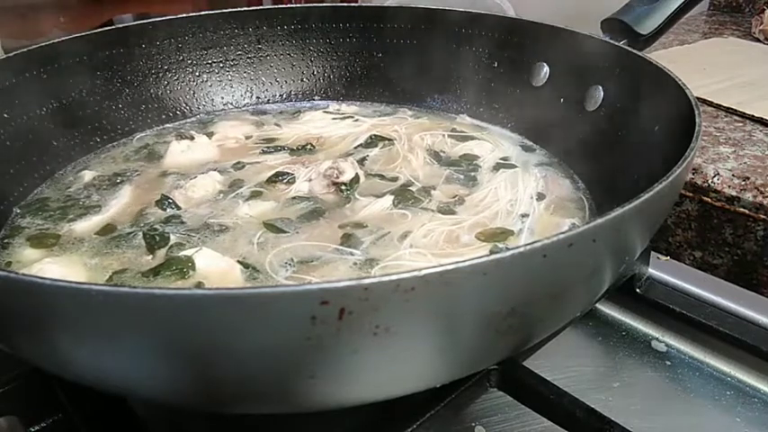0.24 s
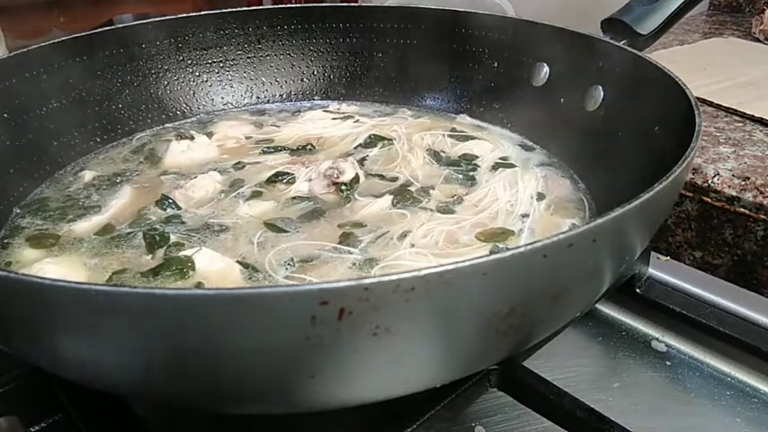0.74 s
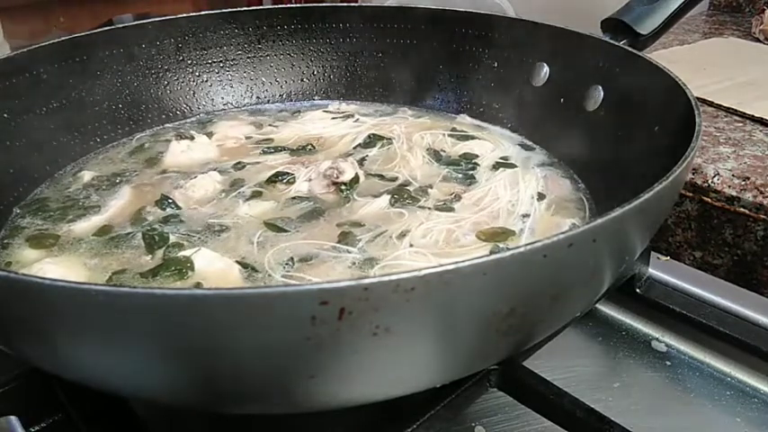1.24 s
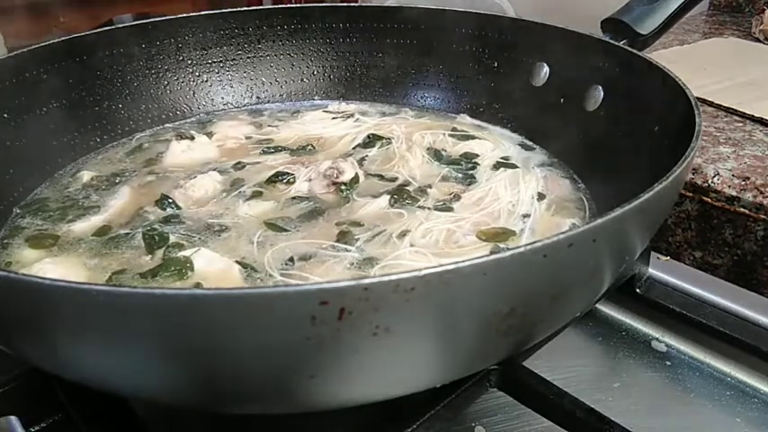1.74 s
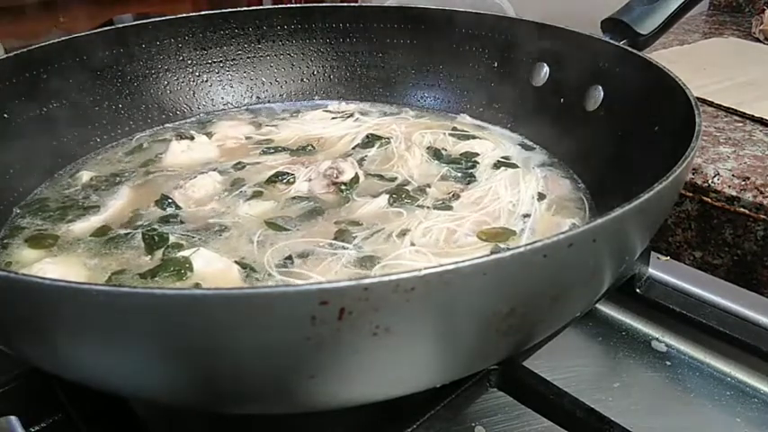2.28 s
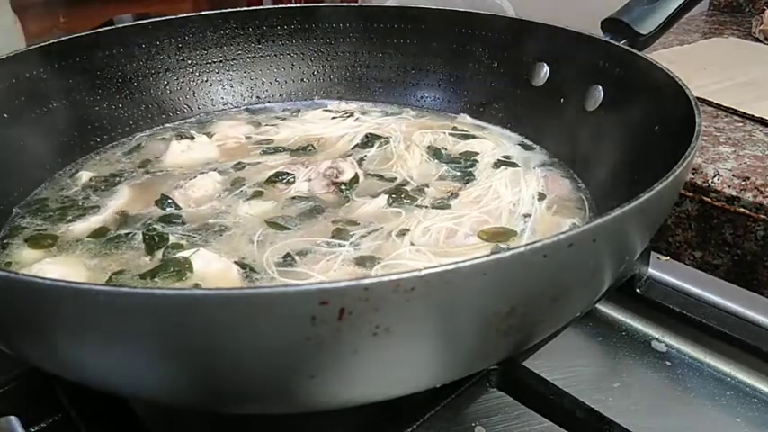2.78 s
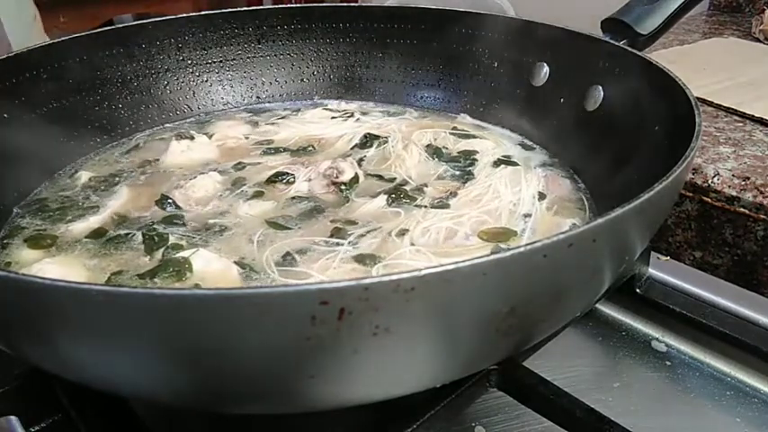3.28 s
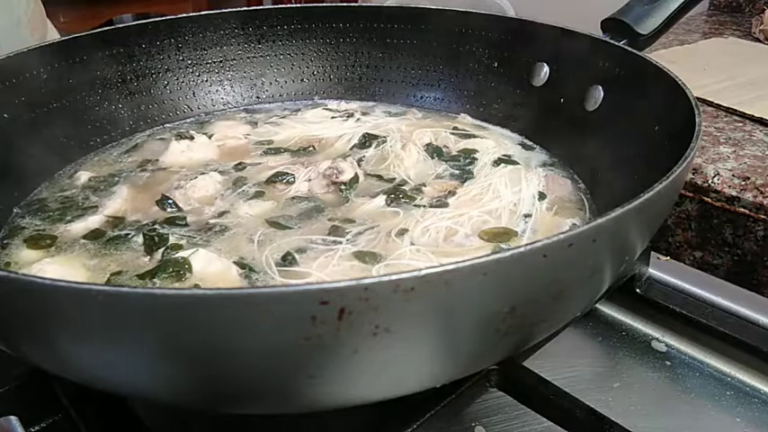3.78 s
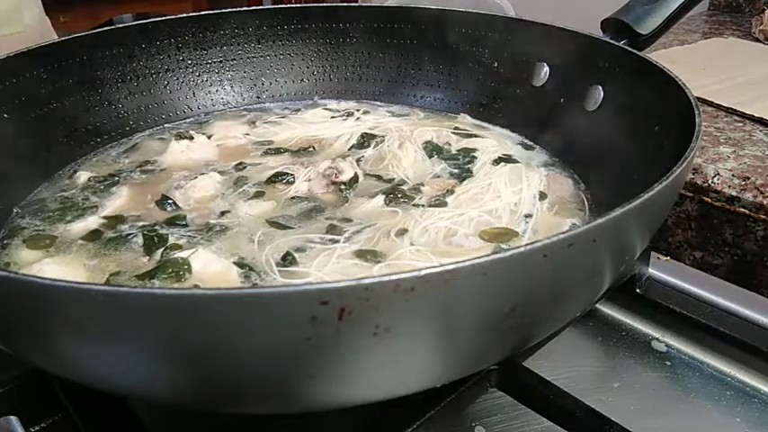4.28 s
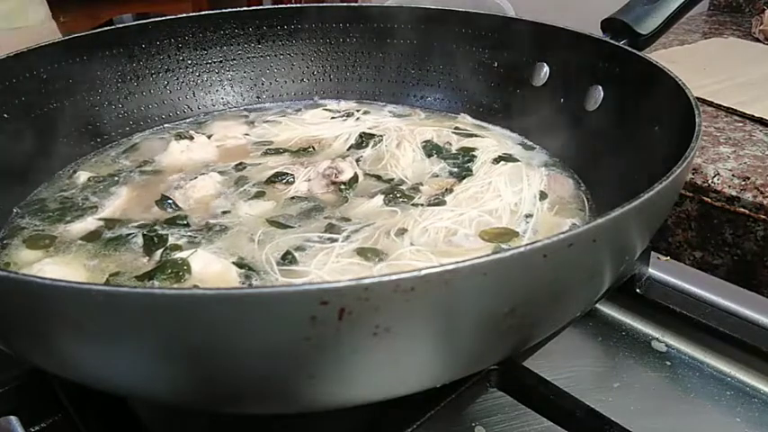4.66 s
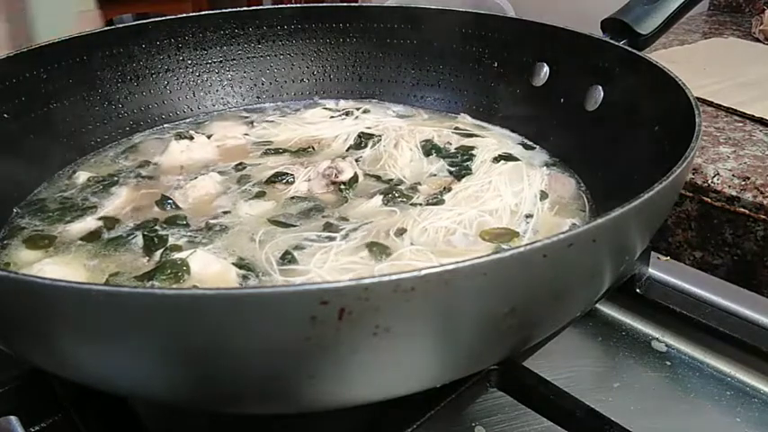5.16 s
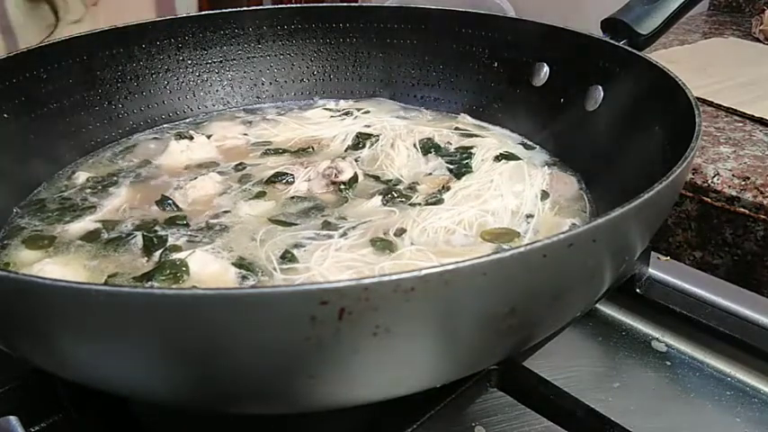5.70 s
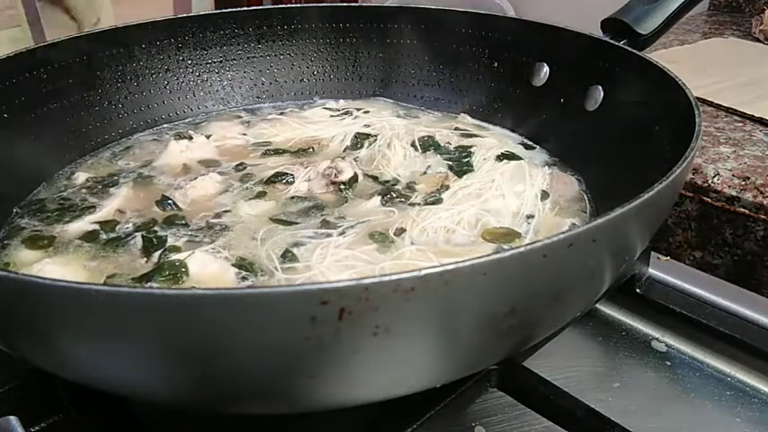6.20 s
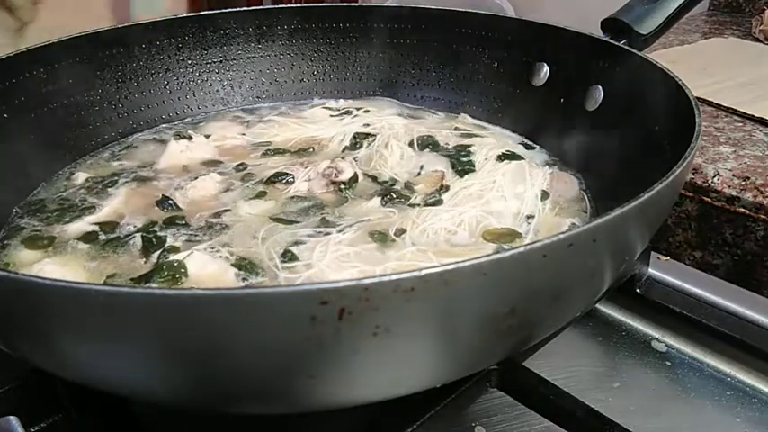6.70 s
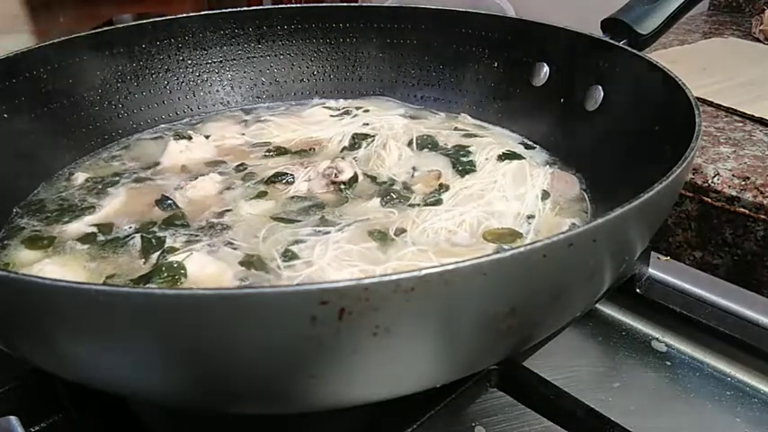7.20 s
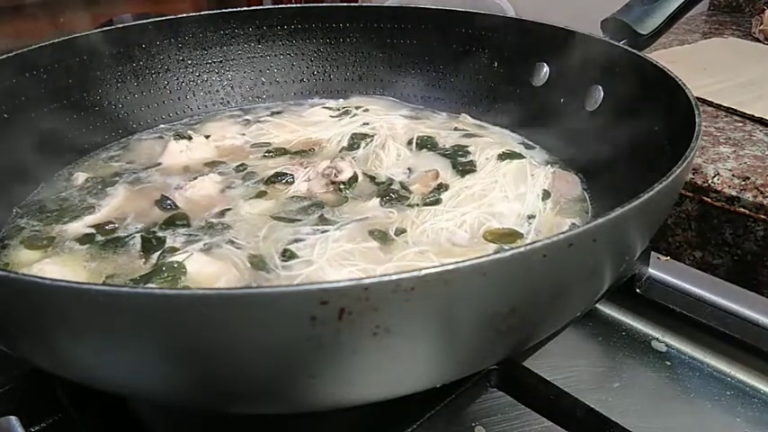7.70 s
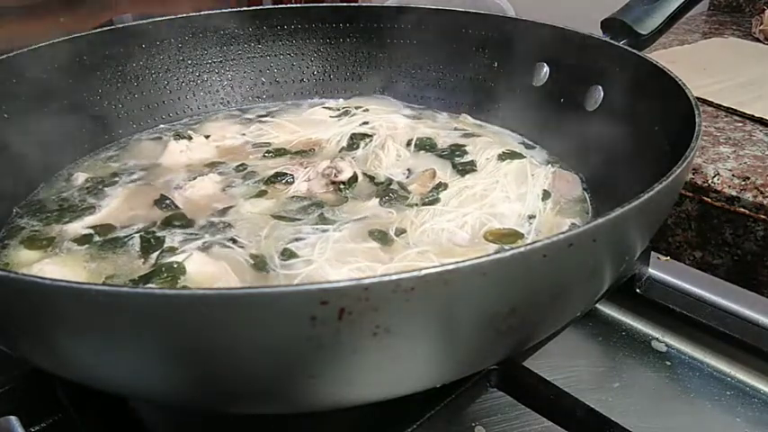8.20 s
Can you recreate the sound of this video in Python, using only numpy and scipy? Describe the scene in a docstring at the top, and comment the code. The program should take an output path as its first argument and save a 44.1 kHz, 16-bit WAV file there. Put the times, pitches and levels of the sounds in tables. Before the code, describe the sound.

In a small kitchen, a dish is set down with a double knock, then brittle pieces snap and crunch unevenly over a very quiet gas flame.

```python
"""A gas burner hums alone at first, then dry pieces rustle and a dish is set down with two knocks.
Pork cracklings are then crushed by hand beside a pan of soup in a small hard-walled kitchen.
Filtered noise makes the burner; each squeeze opens up flurries of tiny ringing breaks.
Noise bursts make the snaps and one big crunch; rising, dying sines make crumbs plop into the soup."""
import sys
import numpy as np
from scipy import signal
from scipy.fft import rfft, irfft
from scipy.io import wavfile

SR = 44100
rng = np.random.default_rng(int(sys.argv[2]) if len(sys.argv) > 2 else 0)


def digitize_waveform(pressure):
    """Quantize a signal to 16-bit integers and store it at the path in sys.argv[1].

    Rows of a 2-D input are taken as channels; values are limited to [-1, 1].
    """
    field = np.atleast_2d(pressure).T
    bounded = np.clip(field, -1, 1)
    quanta = np.round(bounded * 32767).astype(np.int16)
    wavfile.write(sys.argv[1], SR, quanta)


N = 372204
TIME = np.arange(N) / SR

# Spectrum of the flame's low rush: (frequency [Hz], level [dB])
FLAME_SPECTRUM = [(20, -39), (45, -17.5), (65, -5), (95, -5.5), (120, 2), (150, -7), (230, -8.5),
                  (420, -17), (850, -13.5), (1250, -22), (1650, -19.5), (2100, -47.5), (3200, -48.5),
                  (15000, -56)]
# Hissing resonances of the burner jet: (centre [Hz], offset where the level is 12 dB down [Hz], level [dB])
JET_RESONANCES = [(1502, 160, -10), (3670, 120, -31), (4362, 230, -18.5), (5220, 74, -26),
                  (7200, 190, -35.5)]
# Reverberation of the kitchen: (frequency [Hz], time to fall 60 dB [s])
ROOM_DECAY = [(150, 0.42), (1000, 0.51), (3000, 0.59), (7500, 0.48), (15000, 0.35)]
# Light handling of the pieces: (centre time [s], level [dB], half length [s])
RUSTLES = [(1.603, -75, 0.031), (1.72, -83, 0.055), (2.172, -69.5, 0.042), (2.33, -77.5, 0.042),
           (2.556, -85, 0.12)]
# Spectrum of the light handling: (frequency [Hz], level [dB])
RUSTLE_SPECTRUM = [(1500, -12), (5500, -5), (7600, 8), (10000, -15), (15000, -27)]
# The dish touches the counter: (time [s], thud level [dB], bright clack level [dB])
KNOCKS = [(2.731, -35.5, -65), (2.7333, -30, -61), (2.929, -36, -37.5), (2.9323, -36.5, -38),
          (2.951, -37, -41.5)]
# Ringing modes of the dish: (frequency [Hz], level [dB], time to fall 60 dB [s])
DISH_MODES = [(2444, -1, 0.24), (3210, -0.5, 0.11), (4040, 0, 0.099), (4960, -3.5, 0.11), (7020, -13, .08),
              (7980, -15, .12)]
# Spectrum of the dull thud: (frequency [Hz], level [dB])
THUD_SPECTRUM = [(50, -36), (150, -4), (700, -4.5), (1000, 1), (1150, -1.5), (1330, 2.5), (2050, -9),
                 (2500, -7.5), (3100, -23), (7400, -22), (11000, -44)]
# Spectrum of the bright clack: (frequency [Hz], level [dB])
CLACK_SPECTRUM = [(400, -16), (1600, 0.5), (2100, -2), (2600, -10), (7500, -9.5), (9000, -19.5),
                  (15000, -45)]
# Crumbs landing in the soup: (time [s], level [dB], starting bubble pitch [Hz])
PLOPS = [(4.073, -43, 620), (4.132, -36.5, 1190), (4.24, -30, 1150), (4.272, -39, 1010), (4.309, -33, 1046),
         (4.407, -31, 1290), (4.693, -36, 450), (4.741, -31.5, 657), (4.774, -33, 635), (8.319, -29.5, 550)]
# A small dull crack, then one big crunch in several quick bursts: (time [s], level [dB], decay time [s])
CRUNCH_BURSTS = [(3.879, -34, 0.0053), (6.07, -10, 0.0032), (6.078, -24.5, 0.003), (6.087, -28.5, 0.056),
                 (6.102, -24.5, 0.0098), (6.117, -24, 0.0024)]
# Spectrum of the crack and the big crunch: (frequency [Hz], level [dB])
CRUNCH_SPECTRUM = [(50, -26), (120, -10), (190, -2.5), (290, -6), (660, 2), (820, -3.5), (1400, -1.5),
                   (2300, -4), (6000, -2), (7700, 3), (10000, -7), (15500, -26)]
# Loudest single fractures: (time [s], level [dB], body against crispness before a common trim [dB])
SNAPS = [(3.5265, -41.5, -7), (3.5696, -27.5, -7), (3.7923, -32, -12), (3.8012, -28.5, -17),
         (3.8435, -29, -9), (3.89, -26.5, -5.5), (3.9267, -30.5, -14), (4.1029, -32, -8), (4.242, -37, -11),
         (4.433, -27, -11), (4.471, -26.5, -4.5), (4.6733, -29, -9), (4.709, -25, -22), (4.9085, -28, -13),
         (4.9906, -22, -14), (5.0455, -29, -5), (5.3214, -13, -14.5), (5.3405, -14, -26),
         (5.3912, -19.5, -13.5), (5.606, -25.5, -15.5), (6.0167, -32, -16), (6.5223, -30, -4.5),
         (6.861, -26.5, -9.5), (7.0992, -30, -18), (7.1099, -28.5, -14), (7.2169, -16, -16),
         (7.24, -14.5, -13.5), (7.434, -24, -20), (7.565, -23, -8), (7.7486, -21.5, -17),
         (8.1467, -20, -13), (8.3205, -22.5, -10), (8.3706, -23.5, -10)]
# The fist closes on the pieces: (start [s], length [s], level [dB], body against crispness [dB])
SQUEEZES = [(3.58, 0.14, -42, -3.5), (3.721, 0.11, -41.5, -7), (4.049, 0.075, -58.5, 2),
            (4.399, 0.028, -47, 2.5), (4.457, 0.082, -39, -4), (4.693, .12, -41, -4.5),
            (4.9, 0.058, -40, -4), (5.082, 0.068, -44.5, -7), (5.225, .07, -39.5, -6.5),
            (5.318, 0.07, -36, -9), (5.508, 0.035, -39.5, -14), (5.687, 0.06, -46, -5),
            (5.855, 0.034, -46.5, -13), (6.01, 0.07, -47, -9.5), (6.548, .16, -39, -7.5),
            (6.826, 0.091, -41.5, -9.5), (7.091, 0.041, -40.5, -13), (7.224, .19, -39, -7),
            (7.501, 0.097, -31.5, -10), (7.68, 0.096, -44, -6.5), (7.91, 0.065, -34.5, -11),
            (8.108, 0.063, -41.5, -5.5), (8.26, .16, -37, -11.5)]
# The hand keeps its grip between squeezes: (start [s], length [s], level [dB], body against crispness [dB])
GRIPS = [(3.514, 0.41, -56, 4), (4.0, 0.34, -60.5, -2.5), (4.462, 1.6, -49.5, -9),
         (6.38, 0.14, -57.5, -0.5), (6.49, 2.3, -45.5, -7.5)]
# Spectrum of thin cell walls breaking: (frequency [Hz], level [dB])
CRISP_SPECTRUM = [(300, -39.5), (1200, -23), (2500, -6.5), (4500, -3.5), (6200, -4), (7600, 0.5),
                  (8600, -3.5), (11000, -13.5), (15500, -26.5)]
# Spectrum of thicker pieces breaking, also used for splashes: (frequency [Hz], level [dB])
BODY_SPECTRUM = [(70, -16.5), (170, -3), (400, -4), (650, 1), (900, -1.5), (1800, 0), (3000, -6.5),
                 (7000, -33)]


def gain_of(db):
    """Decibels to amplitude."""
    return 10 ** (np.asarray(db) / 20)


def evened(x):
    """Scales to rms 1."""
    return x / np.sqrt(np.mean(x ** 2) + 1e-20)


def read(points, hz):
    """Reads a table on a log-frequency axis."""
    f, value = np.transpose(points)
    return np.interp(np.log(hz + 1), np.log(f + 1), value)


def add(mix, start_s, sound):
    """Mixes a sound in at a time."""
    part = mix[round(start_s * SR):][:len(sound)]
    part += sound[:len(part)]


def colour(x, spectrum, size=4096):
    """Minimum-phase filter of unit energy, so that clicks keep their sharp fronts."""
    hz = abs(np.fft.fftfreq(size, 1 / SR))
    log_gain = np.log(gain_of(read(spectrum, hz)))
    response = np.exp(np.conj(signal.hilbert(log_gain)))
    taps = np.fft.ifft(response).real[:size // 2]
    return signal.oaconvolve(x, taps / np.linalg.norm(taps))[:N]


def waver(rate_hz):
    """Slow random drift of rms 1, holding only rates below rate_hz."""
    slow = np.fft.rfftfreq(N, 1 / SR) < rate_hz
    return evened(irfft(rfft(rng.standard_normal(N)) * slow, N))


def burst(decay_s, front=0., rounds=5):
    """A break: a click of weight front, then a dying rush of tinier cracks with an even spectrum."""
    t = TIME[:int(5 * decay_s * SR) + 8]
    fade = np.exp(-t / decay_s)
    rush = evened(rng.standard_normal(len(t)))
    rush[0] = front * np.sqrt(decay_s * SR / 2)
    rush = rush * fade
    for _ in range(rounds):  # flatten the spectrum while keeping the sharp start and the fade
        phase = np.angle(rfft(rush, 2 * len(t)))
        rush = irfft(np.exp(1j * phase))[:len(t)] * fade ** .15
    return rush / np.linalg.norm(rush) * np.sqrt(decay_s * SR)


def random_sizes(spread_db, cap):
    """Uneven break sizes at every sample: mostly small, a few large, up to a cap."""
    return gain_of(spread_db * np.minimum(rng.exponential(1, N), cap))


def swarm(per_s, spread_db, low_hz, high_hz, cycles, cap=2.24, pitches=24):
    """Many small breaks of uneven size; each fragment rings for a few cycles at one of many pitches."""
    size = random_sizes(spread_db, cap) * rng.choice([-1, 1], N)
    clicks = size * (rng.random(N) < per_s / SR)
    fragment = rng.integers(0, pitches, N)
    t, out = TIME[:512], np.zeros(N)
    for k, hz in enumerate(np.linspace(low_hz, high_hz, pitches)):
        ring = np.cos(2 * np.pi * hz * t) * np.exp(-t * hz / cycles)
        out += signal.oaconvolve(clicks * (fragment == k), ring / np.linalg.norm(ring))[:N]
    return out


def kitchen(x, gap_s=0.0017, per_s=5000):
    """Dense reflections off hard walls, each band dying at its own speed."""
    hits = (rng.random(SR) < per_s / SR) * (TIME[:SR] > gap_s)
    reflections = rng.choice([-1., 1.], SR) * hits
    hz, t, bands = signal.stft(reflections, SR, nperseg=256)
    fade = gain_of(-60 * t / read(ROOM_DECAY, hz)[:, None])
    tail = signal.istft(bands * fade, SR, nperseg=256)[1]
    return signal.fftconvolve(x, tail / np.linalg.norm(tail))[:N]


def burner(level_db=-58):
    """The low rush of the flame, and gas hissing in resonances of the jet; the higher ones waver more."""
    hz = np.fft.rfftfreq(N, 1 / SR)
    out = irfft(rfft(rng.standard_normal(N)) * gain_of(read(FLAME_SPECTRUM, hz)), N)
    for centre_hz, width_hz, db in JET_RESONANCES:
        peak = 1 / (1 + ((hz - centre_hz) / width_hz) ** 2) ** 2
        hiss = irfft(rfft(rng.standard_normal(N)) * peak, N)
        flutter_db = centre_hz / 1900 * waver(5)
        out += hiss * gain_of(db + flutter_db)
    return gain_of(level_db) * evened(out)


def handling():
    """Dry pieces brush against each other before the crushing starts: a swarm of longer-ringing clicks."""
    touch = sum(gain_of(db) * np.exp(-((TIME - at) / length) ** 2) for at, db, length in RUSTLES)
    brushing = swarm(per_s=1000, spread_db=1, low_hz=1970, high_hz=12030, cycles=29)
    return touch * evened(colour(brushing, RUSTLE_SPECTRUM))


def dish(decay_s=0.0016, ring_db=-7.5):
    """One edge lands with a dull thud; the other follows with a clack, rings briefly and bounces."""
    thud, clack, ring = np.zeros((3, N))
    t = TIME[:SR // 3]
    for s, thud_db, clack_db in KNOCKS:
        add(thud, s, gain_of(thud_db) * burst(decay_s, front=0.67))
        add(clack, s, gain_of(clack_db) * burst(decay_s, front=0.25))
        for hz, mode_db, t60 in DISH_MODES:
            fade = gain_of(ring_db + clack_db + mode_db - 60 * t / t60)
            add(ring, s, fade * np.sin(2 * np.pi * (hz * t + rng.random())))
    return colour(thud, THUD_SPECTRUM) + colour(clack, CLACK_SPECTRUM), ring


def plops(cycles=2.75, rise_per_s=5.2, splash=0.57, attack_s=0.00057):
    """Each crumb makes a tiny noise splash and a bubble whose pitch rises as it dies."""
    bubbles, spray = np.zeros((2, N))
    t = TIME[:1600]
    for s, db, hz in PLOPS:
        fade = gain_of(db) * np.exp(-t * hz / cycles) * (1 - np.exp(-t / attack_s))
        add(bubbles, s, fade * np.sin(2 * np.pi * hz * t * (1 + rise_per_s * t)))
        add(spray, s, fade * splash * rng.standard_normal(len(t)))
    return bubbles + colour(spray, BODY_SPECTRUM)


def big_crunch():
    """A small dull crack, then one big crunch in several quick bursts, each a dense rush of cracks."""
    out = np.zeros(N)
    for s, db, decay_s in CRUNCH_BURSTS:
        add(out, s, gain_of(db) * burst(decay_s, front=0.18))
    return colour(out, CRUNCH_SPECTRUM)


def snaps(body_trim_db=-2.5, decay_s=0.001, ring_share=0.62, cycles=2.3, low_hz=4500, high_hz=9000):
    """Single large fractures; each rings briefly at two pitches, and thick pieces add a hollow body."""
    crisp, body = np.zeros((2, N))
    t = TIME[:512]
    pitches = rng.uniform(low_hz, high_hz, (len(SNAPS), 2))
    for (s, db, hollow_db), pair in zip(SNAPS, pitches):
        ring = sum(np.sin(2 * np.pi * hz * t) * np.exp(-t * hz / cycles) for hz in pair)
        ring *= ring_share * np.sqrt(decay_s * SR) / np.linalg.norm(ring)
        size = gain_of(db) / np.hypot(1, ring_share)  # break and ring share the energy
        add(crisp, s, size * ring)
        add(crisp, s, size * burst(decay_s, rounds=1))
        add(body, s, gain_of(body_trim_db + db + hollow_db) * burst(2 * decay_s, rounds=1))
    return colour(crisp, CRISP_SPECTRUM) + colour(body, BODY_SPECTRUM)


def small_snaps(force, per_s=20, level_db=8.0, spread_db=2, body_db=-12, decay_s=0.0006):
    """Lesser fractures come at random, their strength following the pressure of the hand."""
    size = gain_of(level_db + spread_db * rng.uniform(-1.2, 1, N))
    breaks = size * (rng.random(N) < per_s / SR)
    cracks = signal.oaconvolve(breaks * force, burst(decay_s, rounds=1))[:N]
    return colour(cracks, CRISP_SPECTRUM) + gain_of(body_db) * colour(cracks, BODY_SPECTRUM)


def pressure(build_s=0.024, release_s=0.041):
    """Gains of the crisp and hollow crackle: each squeeze or grip builds, holds and dies as pieces give."""
    crisp, body = np.zeros((2, N))
    for start, length, db, hollow_db in SQUEEZES + GRIPS:
        t = TIME - start
        build = np.clip(t / build_s, 0, 1)
        release = np.exp(-np.maximum(t - length, 0) / release_s)
        force = gain_of(db) * build * release
        crisp += force ** 2  # overlapping squeezes add as power
        body += (force * gain_of(hollow_db)) ** 2
    return np.sqrt(crisp), np.sqrt(body)


def avalanches(per_s=210, spread_db=4.0, decay_s=0.0016, between=0.44):
    """One break sets off its neighbours: an envelope of millisecond flurries over a constant floor."""
    starts = random_sizes(spread_db, cap=2) * (rng.random(N) < per_s / SR)
    return between + signal.lfilter([1], [1, -np.exp(-1 / (decay_s * SR))], starts)


def squeezes(crisp_gain, body_gain, body_share=0.44):
    """Thin cell walls crackle brightly while thicker pieces crunch lower down, in the same flurries."""
    flurry = avalanches()
    walls = swarm(per_s=9000, spread_db=3.5, low_hz=1220, high_hz=14560, cycles=1.24)
    pieces = swarm(per_s=3000, spread_db=3.5, low_hz=242, high_hz=3420, cycles=1.22)
    crisp = evened(colour(flurry * walls, CRISP_SPECTRUM))
    body = evened(colour(flurry ** body_share * pieces, BODY_SPECTRUM))  # flurries stand out less here
    return crisp * crisp_gain + body * body_gain


def scene():
    """The burner and light handling stay dry; every other source has its own share of the room."""
    out = burner() + handling()
    knock, ring = dish()
    crisp_gain, body_gain = pressure()
    fractures = snaps() + small_snaps(crisp_gain)
    crackle = squeezes(crisp_gain, body_gain)
    # (source, room level [dB])
    layers = [(knock, -1.5), (ring, -8), (plops(), -10), (big_crunch(), 1), (fractures, -4), (crackle, -6)]
    for source, wet_db in layers:
        out = out + source + gain_of(wet_db) * kitchen(source)
    return out[None]


def record(dry, edge_hz=15900):
    """Rounds off the peaks, then cuts the treble above the band edge."""
    rounded = np.tanh(dry)
    lowpass = signal.firwin(511, edge_hz, window=("kaiser", 9), fs=SR)
    return signal.oaconvolve(rounded, lowpass[None], "same")


dry = scene()
out = record(dry)
digitize_waveform(out)
```